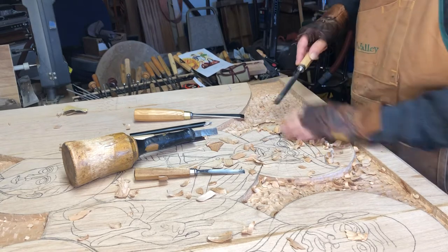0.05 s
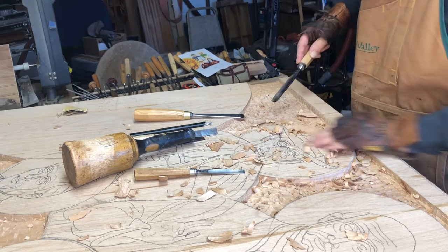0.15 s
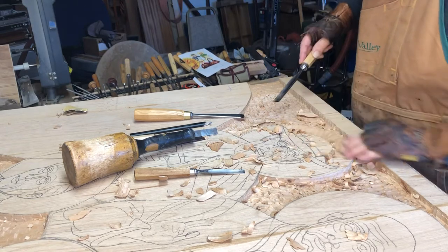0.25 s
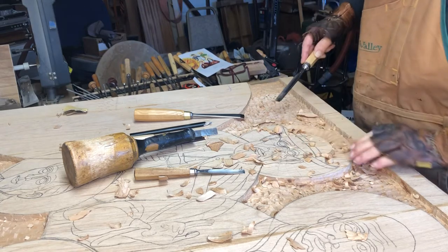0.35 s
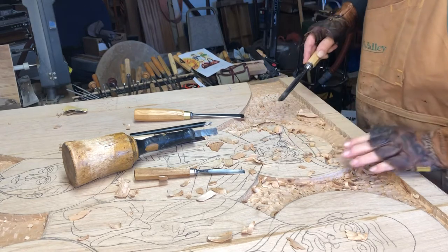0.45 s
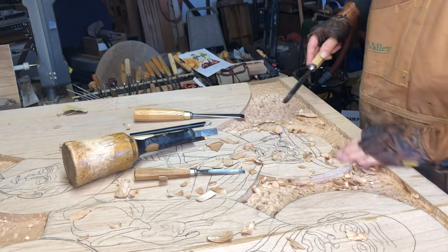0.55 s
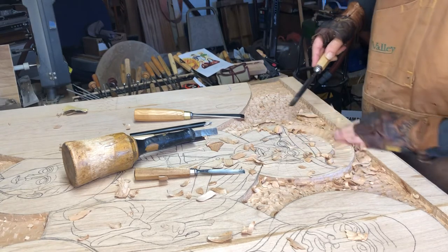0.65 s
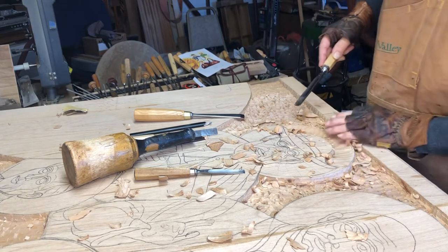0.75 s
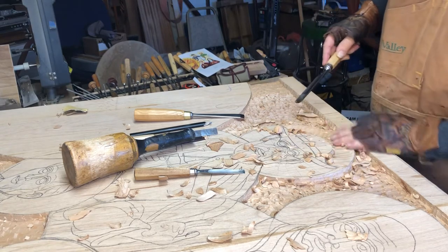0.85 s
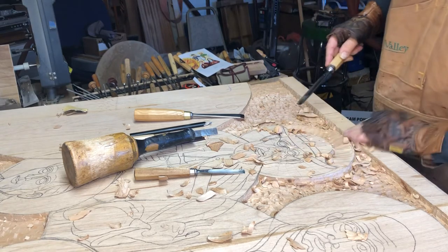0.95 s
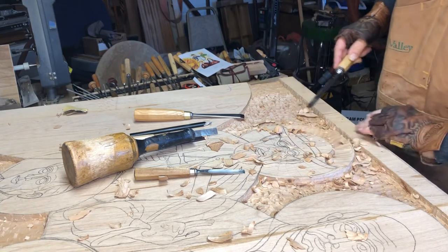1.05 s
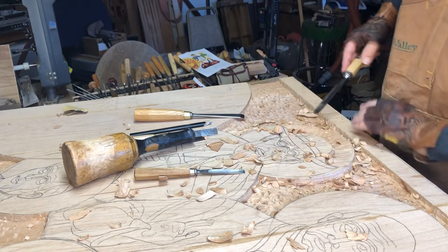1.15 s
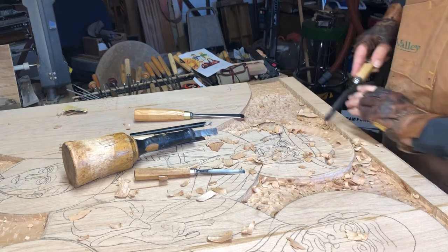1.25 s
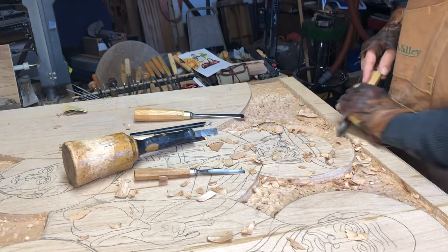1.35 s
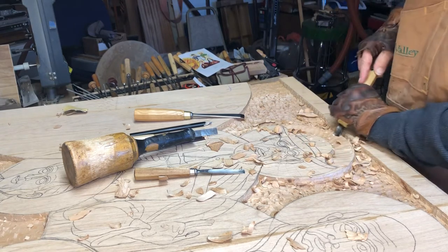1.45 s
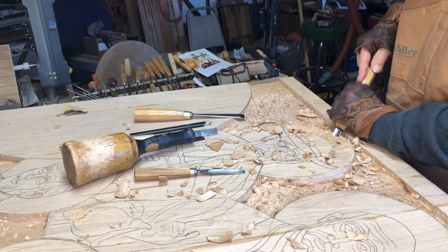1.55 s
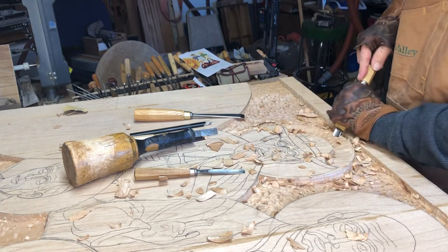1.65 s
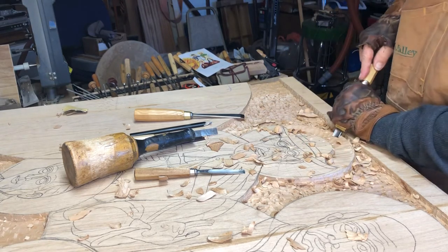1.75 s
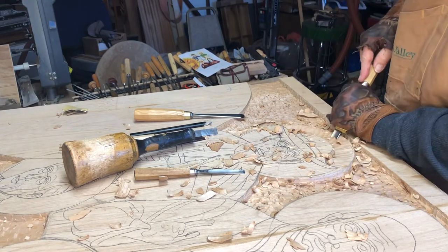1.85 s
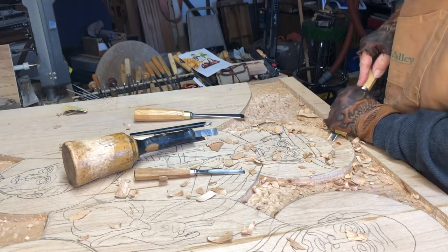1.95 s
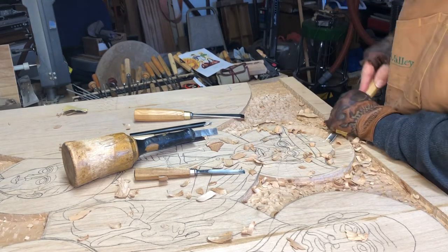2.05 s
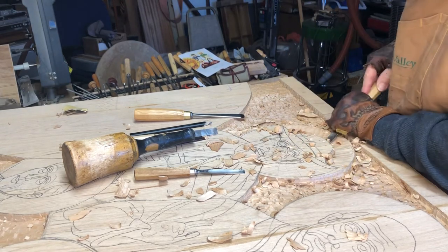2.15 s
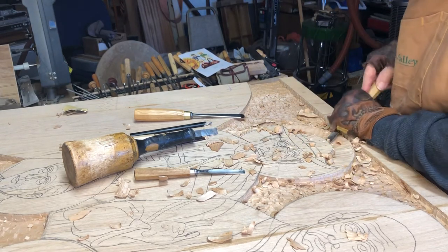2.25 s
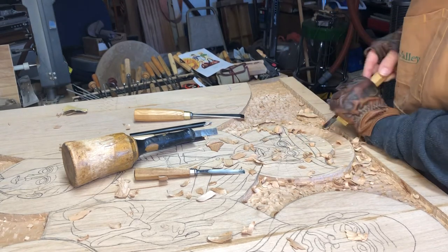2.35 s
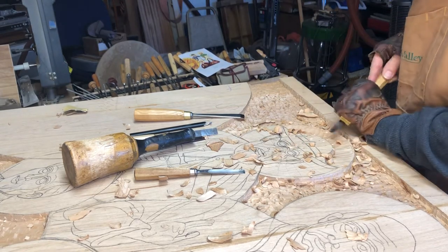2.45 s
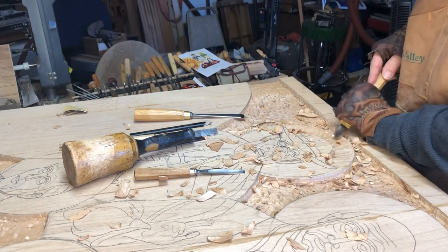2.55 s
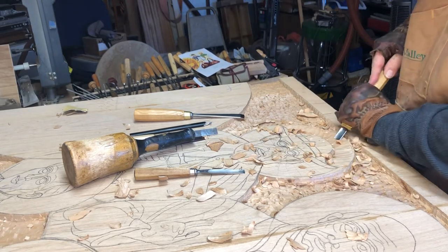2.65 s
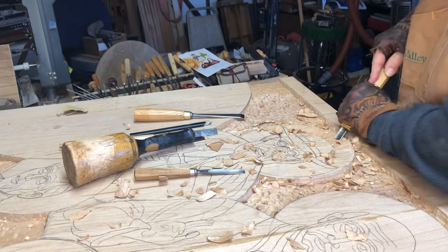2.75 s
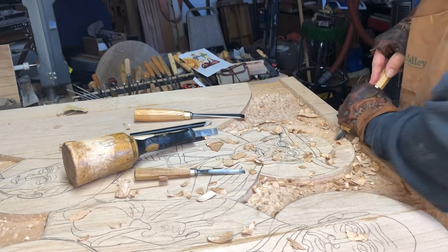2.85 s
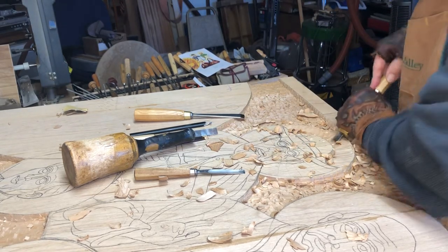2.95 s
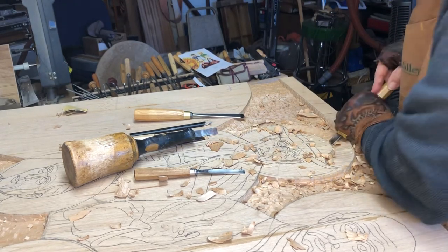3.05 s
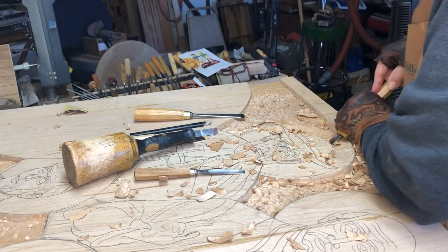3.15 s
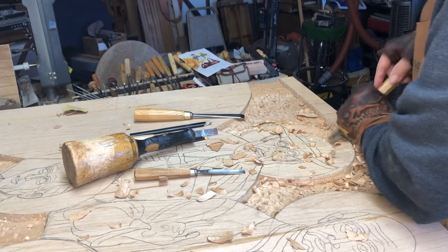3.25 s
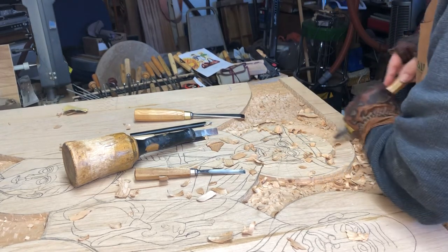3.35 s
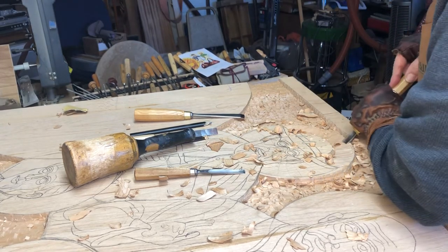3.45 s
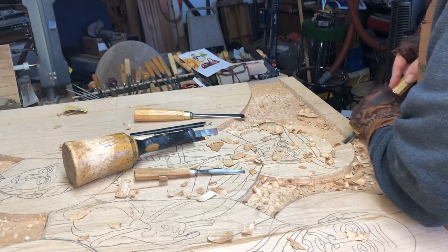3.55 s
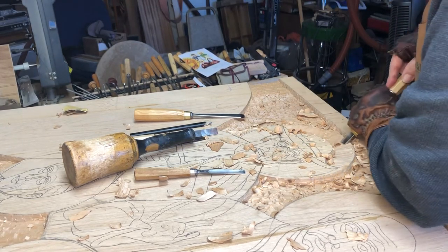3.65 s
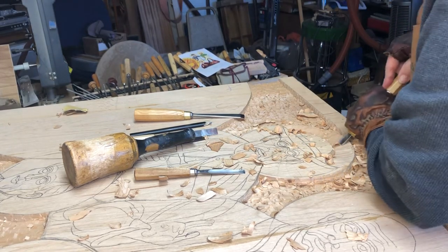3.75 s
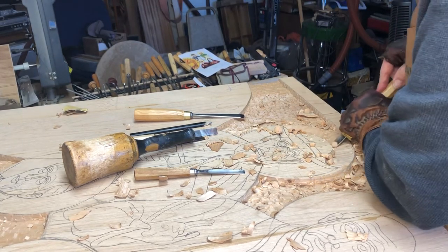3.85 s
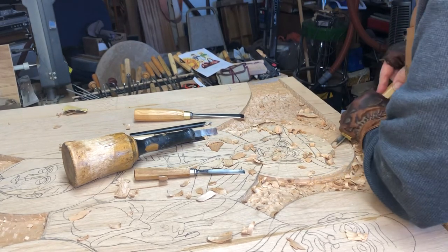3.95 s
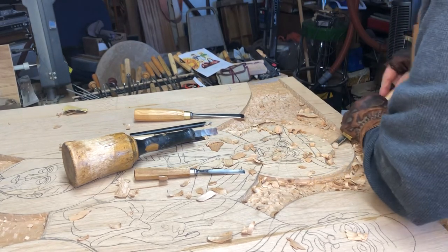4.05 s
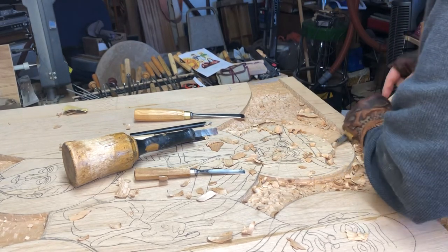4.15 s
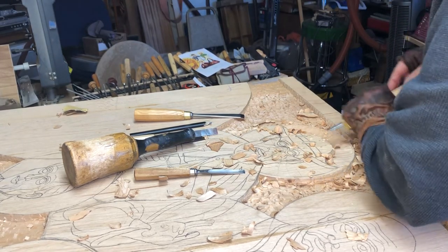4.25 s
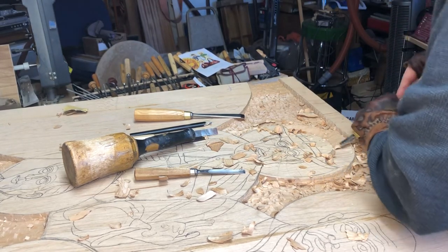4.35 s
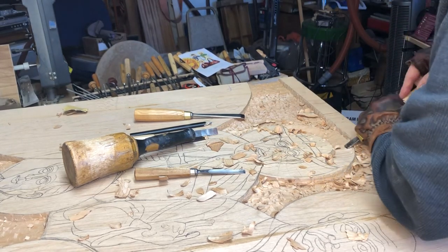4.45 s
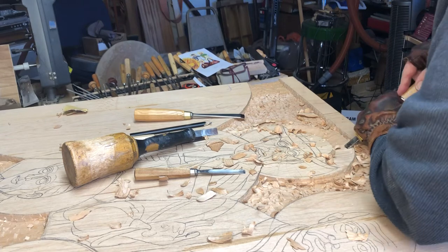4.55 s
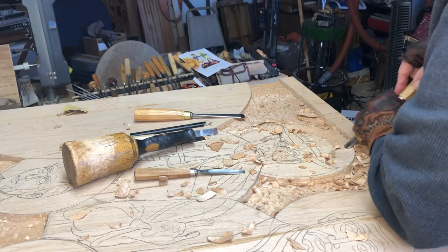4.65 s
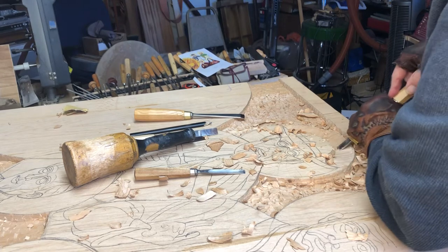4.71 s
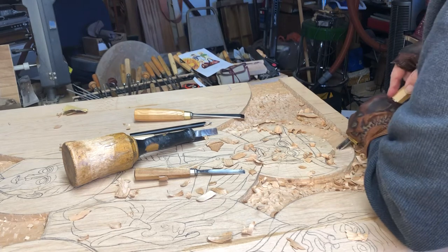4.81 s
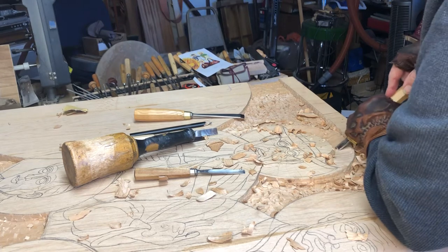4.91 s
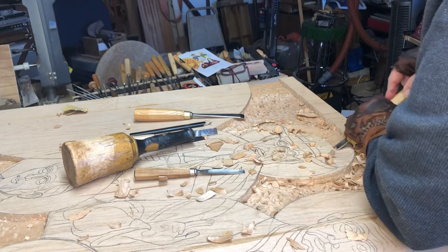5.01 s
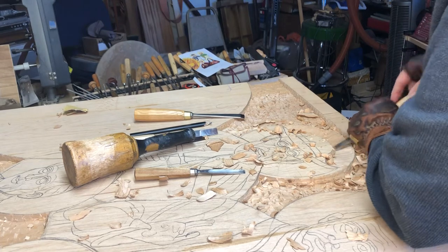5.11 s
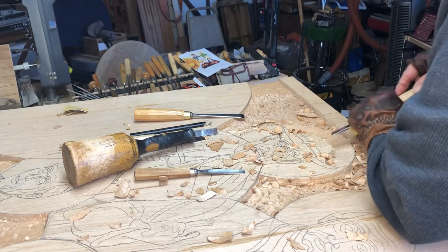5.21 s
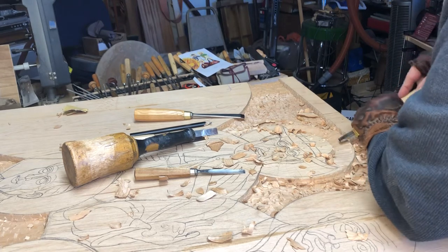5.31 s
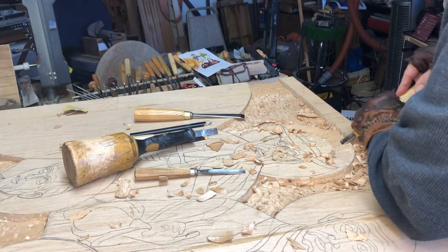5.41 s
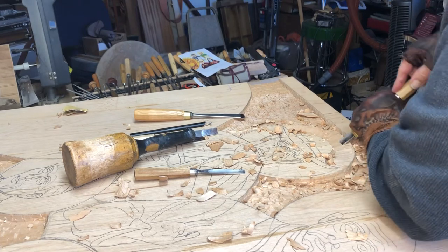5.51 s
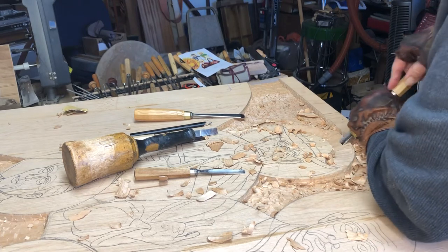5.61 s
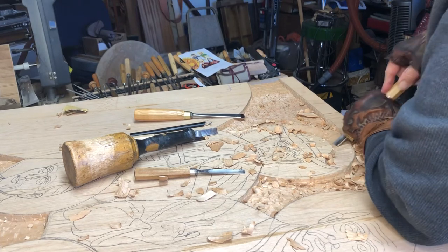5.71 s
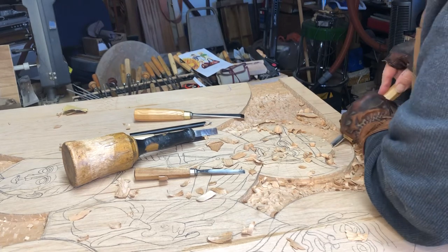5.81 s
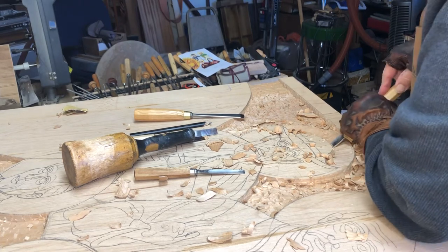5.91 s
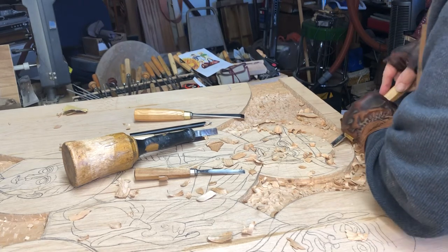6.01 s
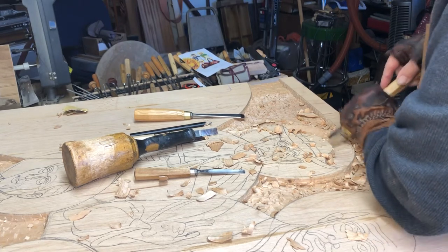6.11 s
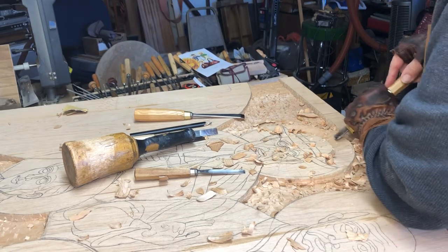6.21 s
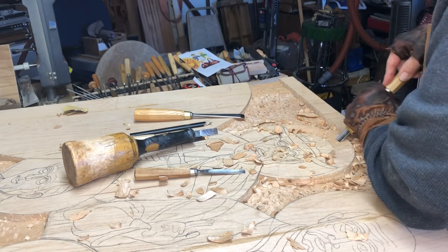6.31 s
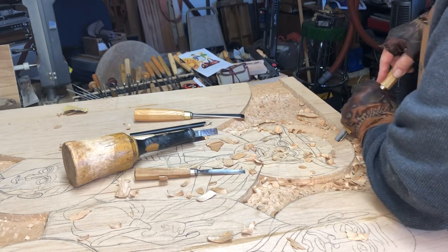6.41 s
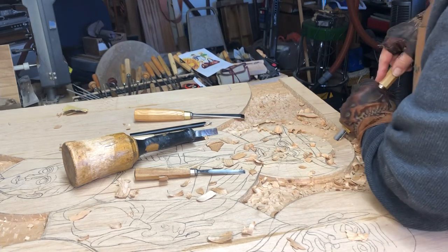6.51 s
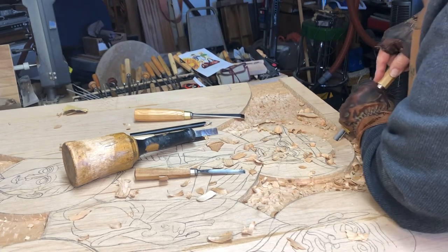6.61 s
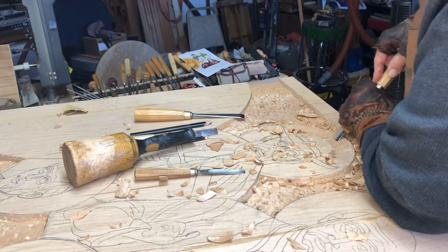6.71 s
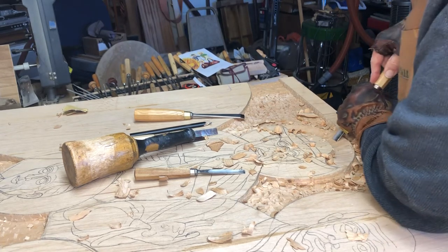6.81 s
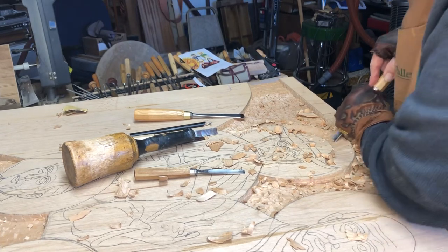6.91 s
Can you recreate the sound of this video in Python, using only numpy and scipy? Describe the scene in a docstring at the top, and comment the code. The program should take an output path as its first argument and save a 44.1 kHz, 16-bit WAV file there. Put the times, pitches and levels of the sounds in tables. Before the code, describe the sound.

In a small, cluttered workshop with short reflections, heard close and in mono, a gloved hand brushes shavings over a wooden panel at 0-0.9 s: soft dry skittering, a bright tick near 0.6 and another at 0.85. Cloth rustles, and the gouge meets the wood with a loud, hollow knock at 1.4. A grainy tearing scrape swells to a thump at 2.0, and a chip flicks off sharply at 2.25. Knocks at 2.55, 3.4, 4.4 and 5.4 begin further cuts, with weaker contacts between them. Crunching pushes peak near 3.0, 3.8, 4.95 and 5.75, with dull thumps, and flicks follow at 3.25, 4.1, 4.7, 5.1 and 6.05. After a quieter gap, a last strong scrape ends in the heaviest thump at 6.95. Underneath lie faint sleeve rustle, quiet air, a low rumble growing after 1-2 s and a very faint, thin, steady high tone.

```python
"""Scrapes, knocks and thumps: a gouge is pushed by hand through a large wooden panel in a small workshop.
A gloved hand first sweeps shavings away. Then the tool is set down with knocks, and its edge tears through
the fibres in strokes of growing force, made of thousands of tiny snaps. Chips give way with thumps that shake
the panel and are flicked off. Sleeves rustle, made of fine rubbing grains, over room air, a low rumble
and a faint, thin, steady high tone."""
import sys
import numpy as np
from scipy import signal
from scipy.fft import rfft, irfft, next_fast_len
from scipy.io import wavfile
from scipy.ndimage import map_coordinates

SR = 44100
rng = np.random.default_rng(int(sys.argv[2]) if len(sys.argv) > 2 else 0)


def output_pcm(signal):
    """Save a mono or channel-first signal as 16-bit PCM at the path in sys.argv[1].

    Samples are clipped to [-1, 1] before scaling.
    """
    pcm = np.clip(np.atleast_2d(signal).T, -1, 1) * 32767
    wavfile.write(sys.argv[1], SR, np.round(pcm).astype(np.int16))


N = 307377  # length in samples

# The gouge is pushed ever harder until it stalls or the chip gives way with a thump:
# [stop t/s, length/s, final level/dB, swell exponent, treble/dB and bass/dB against that level, thump/dB]
PUSHES = [(1.998, .275, -38.5, 1.1, -16.5, 1, -28), (2.964, 0.2, -37.5, 0.93, -16, -2, -18),
          (3.777, 0.24, -37.5, 3.1, -21, -4.5, -54), (3.882, .063, -40.5, 0.17, -21, -1.5, -29),
          (4.944, 0.23, -37.5, 3.5, -24, -8.5, -22.5), (5.697, 0.12, -34.5, 2.6, -22, -7, -49),
          (5.7961, 0.036, -35.5, 0.6, -21.5, -2.5, -15.5), (6.813, 0.13, -40, 1.7, -21.5, -0.5, -45),
          (6.958, 0.14, -32.5, 0.97, -20.5, 0, -12)]
# The chip is flicked off, and the panel springs back as it leaves:
# [t/s, length/s, level/dB, fade by 20 dB/s, treble/dB against that level, thump/dB]
FLICKS = [(2.26, 0.0098, -27, 0.011, -16.5, -25), (3.251, 0.0047, -26, 0.0071, -18.5, -25.5),
          (4.13, 0.0092, -42.5, 0.074, -9, -48), (4.699, 0.0086, -46, 0.12, -18, -44.5),
          (5.133, 0.0092, -43.5, 0.07, -9.5, -56), (6.046, 0.0042, -38.5, 0.054, -14, -34.5)]
# The tool meets the wood: [t/s, strength/dB, ring f/Hz, hardness/dB]
KNOCKS = [(1.376, 8, 1110, 7.5), (2.567, -1.5, 1022, 5), (3.431, -7, 966, 6), (3.991, -21, 950, 2),
          (4.38, -3, 975, 4.5), (5.39, -5.5, 994, 7), (6.288, -13, 1035, -15)]
# Bright hiss of stiff splinters and of sliding cloth: [f/Hz, relative level/dB]
FIZZ = [(3000, -40), (3900, 6.5), (4500, 3), (7500, 4.5), (11000, 1), (15500, -2.5)]


def cutting(split_hz):
    """Fibres snap under the edge: each shakes the panel and spits a little treble straight into the air."""
    # Sound of the snaps through the wood: [f/Hz, relative level/dB]
    fibres = [(30, -56), (70, -37.5), (140, -6), (450, 0.5), (570, -6.5), (850, -5), (1250, -9.5),
              (1800, -7), (2250, -12), (2700, -14), (4000, -19.5), (5400, -20), (7000, -32.5),
              (15500, -62.5)]
    # Treble straight from the cutting edge: [f/Hz, relative level/dB]
    edge = [(1500, -43.5), (3800, 4.5), (4700, 4), (5700, 2.5), (7200, -2), (9000, 1.5), (10500, -4),
            (15500, -3.5)]
    body, treble, bass = gouge_motion()
    snaps = grains(7000, spread_db=1.0, clump_db=2.5, clump_rate=270)
    wood = unit(filtered(snaps, lambda hz: causal(along(fibres, hz) + panel_db(hz))))
    # A deep cut bends the whole panel: the part below the split follows its own gain
    flex = filtered(wood, lambda hz: 1 / (1 + (hz / split_hz) ** 4))
    return body * (wood - flex) + bass * flex + treble * coloured(snaps, edge)


def gouge_motion():
    """Gains of body, treble and bass: slow pushes that build with the force, and quick flicks that fade."""
    push_release_s = 0.028  # the cut dies away by 20 dB once the edge stops
    treble_growth, bass_growth = 0.97, 0.72  # exponents: how treble and bass follow the force
    flick_attack_s, flick_bass_db = 0.0058, -3.5
    catch_s, catch_db = 0.015, -24  # the edge slides under the chip just before; level against the flick
    body, treble, bass = np.zeros((3, N))
    for s, length, db, swell, treble_db, bass_db, _ in PUSHES:
        force = envelope(s, length, 0, push_release_s, swell)
        body += amp(db) * force
        treble += amp(db + treble_db) * force ** treble_growth
        bass += amp(db + bass_db) * force ** bass_growth
    for s, length, db, fade, treble_db, _ in FLICKS:
        catch = amp(catch_db) * envelope(s - catch_s, flick_attack_s, catch_s, fade)
        flick = envelope(s, flick_attack_s, length, fade, swell=5.4)
        force = amp(db) * np.maximum(catch, flick)
        body += force
        treble += amp(treble_db) * force
        bass += amp(flick_bass_db) * force
    return body, treble, bass


def knocks():
    """The gouge rings when it is set down for the next cut, and when a flick frees it."""
    free_ring_hz, free_ring_db = 880, 11.5  # pitch, and strength against the flick
    track = np.zeros(N)
    for s, db, ring_hz, hard_db in KNOCKS:
        add(track, s, amp(db) * knock(ring_hz, hard_db))
    for s, _, db, *_ in FLICKS:
        add(track, s, amp(db + free_ring_db) * knock(free_ring_hz, hard_db=1))
    return track


def knock(ring_hz, hard_db):
    """One blow: a few broad, quickly damped resonances, uneven in a new way at each spot."""
    # Ring of the struck tool and wood: [multiple of the ring pitch, width/Hz, relative level/dB]
    resonances = [(.16, 120, -10.5), (0.359, 250, -5), (.74, 201, -9.5), (1, 252, 2.5), (1.159, 196, -2.5),
                  (2.05, 470, -12.5), (3.1, 730, -26), (4.6, 2200, -44)]

    def response(hz):
        """Gain and phase of the blow at each frequency."""
        power = 0
        for multiple, width, db in resonances:
            offset = 2 * (hz - multiple * ring_hz) / width
            power = power + amp(2 * db) / (1 + offset ** 2) ** 2.02
        # A harder contact adds highs over the octave above the ring pitch
        contact_db = hard_db * np.clip(np.log2((hz + 1) / ring_hz), 0, 1)
        spot_db = 1.7 * map_coordinates(rng.standard_normal(len(hz)), [hz / 110])
        level_db = 10 * np.log10(power) + contact_db + spot_db + 0.55 * panel_db(hz)
        return causal(level_db) * bending(hz, travel=0.00141)

    blow = filtered(signal.unit_impulse(SR // 4), response)
    return blow / np.linalg.norm(blow)


def thumps():
    """The load lets go at once: one low push through the panel, which shudders briefly."""
    # Low push of the panel springing back: [f/Hz, relative level/dB]
    spring = [(25, -46), (55, -6), (120, -4.5), (300, 3.5), (480, 2.5), (700, -5), (950, -12.5),
              (2000, -23.5), (4000, -55), (9000, -70)]
    settle_s, settle_db = 1.606, -45  # the guiding hand comes down on the panel
    shudder_db, shudder_t60 = -5.5, 0.096  # level against the thump; seconds to fall 60 dB
    track, t = np.zeros(N), np.arange(SR // 6) / SR

    def response(hz):
        """Gain and phase of the push at each frequency."""
        return causal(along(spring, hz) + 0.59 * panel_db(hz)) * bending(hz, travel=0.00076)

    push = filtered(signal.unit_impulse(SR // 4), response)
    push = push / np.abs(push).max()
    releases = [(s, db) for s, *_, db in PUSHES]
    releases += [(s + length, db) for s, length, *_, db in FLICKS]
    releases += [(settle_s, settle_db)]
    for s, db in releases:
        # Fading noise stands for the panel's many modes
        shudder = rng.standard_normal(len(t)) * amp(-60 * t / shudder_t60)
        shaken = signal.fftconvolve(push, shudder / np.linalg.norm(shudder))
        add(track, s, amp(db) * push)
        add(track, s + 0.002934, amp(db + shudder_db) * shaken)
    return track


def panel_db(hz):
    """The lift that the panel's resonances give at each frequency."""
    # Resonances of the panel on its bench: [f/Hz, width/Hz, lift/dB]
    modes = [(142, 13.2, 14), (171.3, 17.4, 12), (253.7, 8.1, 10), (321.6, 28, 10.5), (458.2, 20.6, 8.5),
             (640, 9.9, 7), (743, 155, 8), (1037.7, 41, 11), (1488, 153, 8.5), (1775, 13, 5.5),
             (2140, 50, 7)]
    return sum(db / (1 + (2 * (hz - centre) / width) ** 2) for centre, width, db in modes)


def bending(hz, travel):
    """Bending waves carry highs across the panel sooner than lows; travel is the seconds taken at 1 kHz."""
    return np.exp(-4j * np.pi * travel * np.sqrt(hz * 1000))


def ticks(t60):
    """Dry chips snap or land with short bright clicks of noise, falling 60 dB in t60 seconds."""
    # Loose chips: [t/s, peak level/dB]
    chip_clicks = [(0.0656, -54), (0.5753, -28), (0.855, -37), (1.3544, -38), (1.5372, -45), (2.417, -36.5),
                   (4.263, -50), (4.877, -49), (5.5039, -42)]
    spectrum = [(300, -16), (1500, -5.5), (4000, -9), (15000, -15)]  # [f/Hz, relative level/dB]
    track, t = np.zeros(N), np.arange(SR // 20) / SR
    for s, db in chip_clicks:
        burst = rng.standard_normal(len(t)) * amp(-60 * t / t60)
        click = coloured(burst, spectrum)
        add(track, s, amp(db) * click / np.abs(click).max())
    return track


def sweeping():
    """Shavings skitter over the panel; a few stiff splinters tick above the rest."""
    # The glove brushes shavings away: [full at t/s, attack/s, hold/s, level/dB, treble/dB against level]
    brushes = [(.07, 0.01, 0.16, -45, -4), (.5, 0.066, 0.067, -49, -9), (.578, 0.0066, 0.04, -46.5, -5),
               (.855, 0.0087, 0.054, -53, -9.5)]
    # Sound of the skittering shavings: [f/Hz, relative level/dB]
    shavings = [(60, -7.5), (300, -9), (800, -2.5), (1300, 2), (1900, 1), (2800, -4), (4500, -4),
                (8000, -22), (15500, -8)]
    shake_db, shake_s = -68, 0.042  # rattle after a knock: level against its strength, hold and fall time
    body, treble = rubbing(brushes, release=0.15)
    for s, db, *_ in KNOCKS:  # loose shavings rattle
        treble = treble + amp(db + shake_db) * envelope(s, 0.0067, shake_s, shake_s)
    chips = grains(14000, spread_db=1.5, clump_db=2.5, clump_rate=160)
    splinters = unit(grains(10000, spread_db=1, clump_db=1.5, clump_rate=200))
    stiff = (rng.random(N) < 110 / SR) * rng.standard_normal(N)  # about 110 ticks a second
    fizz = coloured(splinters + unit(stiff) / 2, FIZZ)
    return body * coloured(chips, shavings) + treble * fizz


def clothes(stir_db):
    """Cloth slides on cloth as the arms move, and stirs faintly in between."""
    # Sleeve and apron rub: [fastest at t/s, attack/s, hold/s, level/dB, treble/dB against level]
    arm_moves = [(1.34, .26, 0.027, -54.5, -10), (2.29, .17, 0.0089, -56, -7),
                 (2.418, 0.0039, 0.077, -55, -8), (2.79, 0.23, 0.048, -52.5, 2),
                 (3.15, 0.15, 0.12, -54.5, -6.5), (3.41, 0.066, 0.0051, -65.5, -7),
                 (4.263, .003, 0.048, -52.5, -18), (5.12, 0.15, .02, -59, -7),
                 (6.18, 0.25, 0.0067, -61.5, -19), (6.55, 0.4, 0.41, -67, -6)]
    # Sound of the rubbing threads: [f/Hz, relative level/dB]
    rustle = [(80, 7.5), (350, -3.5), (1000, 5.5), (2000, 4), (3000, 2.5), (5000, -1), (7000, -14.5),
              (15500, -38)]
    body, treble = rubbing(arm_moves, release=0.18)
    # The carver settles into a stance: the faint stirring halves
    settling = np.interp(np.arange(N) / SR, [0, 3.2, 3.6], [1, 1, .5])
    stir = amp(stir_db + 1.2 * wobble(36)) * settling
    threads = grains(16000, spread_db=4.5, clump_db=2.3, clump_rate=120)
    swish = skimmed(coloured(rng.standard_normal(N), FIZZ), delay=.00053, bounce_db=-13)
    return (body + stir) * coloured(threads, rustle) + (treble + stir / 2) * swish


def rubbing(rows, release):
    """Gains of body and treble for hand movements that speed up, glide and come to rest."""
    body, treble = np.zeros((2, N))
    for s, attack, hold, db, treble_db in rows:
        speed = envelope(s, attack, hold, release)
        body += amp(db) * speed
        treble += amp(db + treble_db) * speed ** 1.3  # faster is brighter
    return body, treble


def skimmed(x, delay, bounce_db):
    """Treble also bounces off the flat panel; the comb of bands drifts as the hands move."""
    now = np.arange(N)
    lag = delay * SR * (1 + 0.088 * wobble(2.97))  # samples
    bounce = np.interp(now - lag, now, x)
    return unit(x + amp(bounce_db) * bounce)


def workshop(x, clutter_db, tail_db):
    """Near walls answer, clutter scatters briefly, with a short tail of noise drawn afresh every 1/3 second."""
    # Near walls and ceiling, heard after a treble cut: [delay/s, level/dB]
    walls = [(.00795, -11.5), (.0192, -16.5), (.0252, -28.5), (.049, -18)]
    # How long the room's tail takes to fall 60 dB: [f/Hz, fall time/s]
    tail_times = [(100, 0.69), (320, 0.39), (700, 0.24), (2000, 0.19), (6000, 0.15), (15000, 0.019)]
    wet = x.copy()
    dull = filtered(x, lambda hz: amp(along([(2000, -3.0), (9000, -5)], hz)))
    for delay, db in walls:
        add(wet, delay, amp(db) * dull)
    hop = SR // 3
    for start in range(0, N, hop):
        hz, t, z = signal.stft(rng.standard_normal(SR // 2), SR, nperseg=256)
        fade = amp(-60 * t / along(tail_times, hz)[:, None])
        tail = signal.istft(z * fade, SR, nperseg=256)[1]
        clutter = rng.standard_normal(len(tail)) * amp(-60 * np.arange(len(tail)) / SR / 0.034)
        answer = amp(tail_db) * tail / np.linalg.norm(tail)
        answer = answer + amp(clutter_db) * clutter / np.linalg.norm(clutter)
        add(wet, start / SR + .002, signal.fftconvolve(x[start:start + hop], answer))
    return wet


def background():
    """Coloured noise makes the air and a bench rumble that grows as the carver leans; a sine adds a high tone."""
    # Still room air: [f/Hz, relative level/dB]
    air_spectrum = [(15, -40), (25, -27), (66, 0.5), (200, -3.5), (400, 0.5), (600, -13), (1400, -8.5),
                    (4000, -18.5), (11000, -28.5), (15000, -31)]
    # Low rumble of the bench: [f/Hz, relative level/dB]
    rumble_spectrum = [(15, -23), (35, -30), (52, 3), (100, -7.5), (300, -21.0), (700, -16.5), (3000, -52)]
    thin_tone_hz = 15500
    t = np.arange(N) / SR
    drift_db, sway_db = 1.2 * wobble(5), 2.5 * wobble(8)
    air = amp(-62.0 + drift_db) * coloured(rng.standard_normal(N), air_spectrum)
    thin_tone = amp(-76.5) * np.sin(2 * np.pi * thin_tone_hz * t + wobble(60))
    lean_db = np.interp(t, [1.1, 2.3], [-69, -60])
    rumble = coloured(rng.standard_normal(N), rumble_spectrum)
    return air + thin_tone + amp(lean_db + sway_db) * rumble


def grains(rate, spread_db, clump_db, clump_rate):
    """Tiny fractures or rubs at random times and sizes, about rate a second, bunched by stick and slip."""
    happens = rng.random(N) < rate / SR
    size_db = spread_db * rng.standard_normal(N) + clump_db * wobble(clump_rate)
    return happens * rng.standard_normal(N) * amp(size_db)


def wobble(rate):
    """A smooth random curve, rate knots a second."""
    return map_coordinates(rng.standard_normal(int(N * rate / SR) + 4), [np.arange(N) * rate / SR], order=2)


def envelope(s, attack, hold, release, swell=1):
    """Gain per sample: rises to 1 at time s, holds, then falls 20 dB per release time."""
    t = np.arange(N) / SR - s
    rise = np.clip(1 + t / attack, 0, 1) ** swell
    return rise * amp(-20 * np.clip((t - hold) / release, 0, 10))


def coloured(x, spectrum):
    """x with a spectrum, at rms 1."""
    return unit(filtered(x, lambda hz: causal(along(spectrum, hz))))


def filtered(x, response):
    """x times a complex response of frequency."""
    size = next_fast_len(len(x) + 8192)
    return irfft(rfft(x, size) * response(np.fft.rfftfreq(size, 1 / SR)), size)[:len(x)]


def causal(db):
    """The causal response with these gains on an even frequency grid, so no sound precedes its cause."""
    cepstrum = irfft(np.log(amp(db)))
    half = len(cepstrum) // 2
    return np.exp(rfft(np.r_[cepstrum[0], 2 * cepstrum[1:half], np.zeros(half)]))


def along(points, hz):
    """Values read between (f/Hz, value) points on a log frequency axis."""
    f, v = np.transpose(points)
    return np.interp(np.log(hz + 1), np.log(f + 1), v)


def add(track, s, x):
    """Mix x into the track from time s."""
    room_left = track[round(s * SR):]
    room_left[:len(x)] += x[:len(room_left)]


def amp(db):
    """Decibels to gain."""
    return 10 ** (np.asarray(db) / 20)


def unit(x):
    """Scale to rms 1."""
    return x / np.sqrt(np.mean(x ** 2) + 1e-20)


def scene():
    """All the work at the bench, heard in the workshop."""
    tool = cutting(split_hz=720) + knocks() + thumps()
    work = tool + ticks(t60=0.032) + sweeping() + clothes(stir_db=-76.5)
    heard = workshop(work, clutter_db=-12, tail_db=-10.5)
    return (heard + background())[None]


def record(dry):
    """Nothing is kept above the band limit."""
    top_hz = 15830
    return np.array([filtered(channel, lambda hz: hz < top_hz) for channel in dry])


dry = scene()
out = record(dry)
output_pcm(out)
```